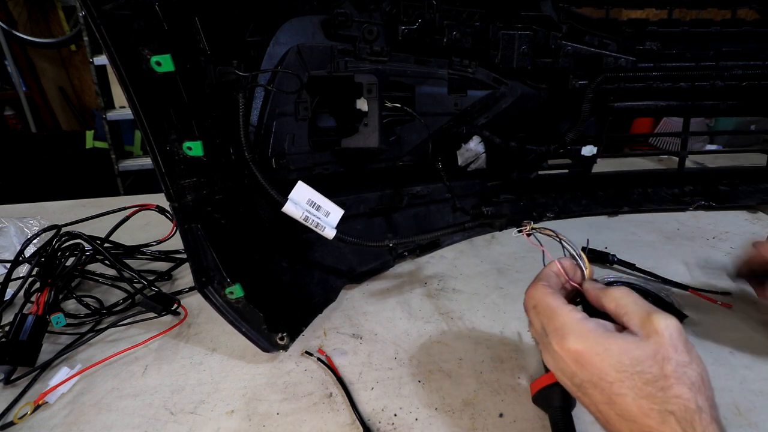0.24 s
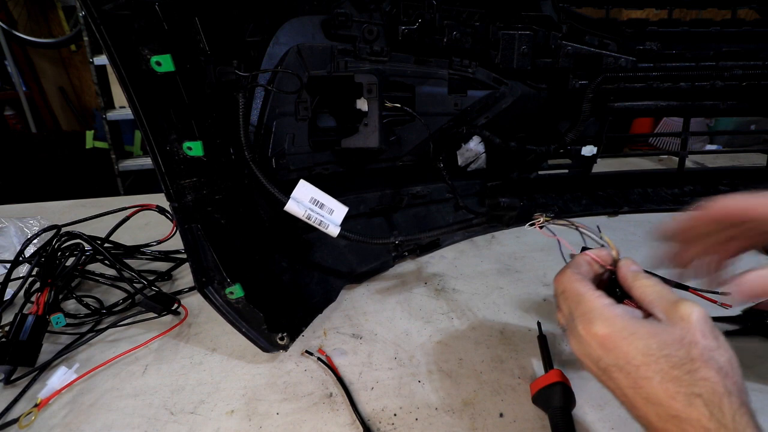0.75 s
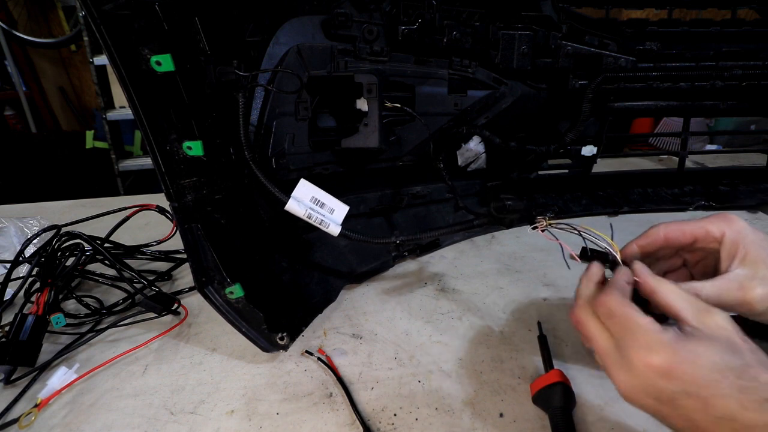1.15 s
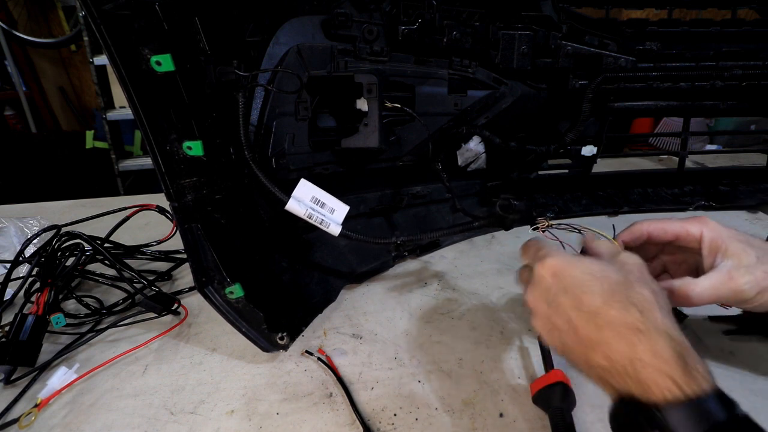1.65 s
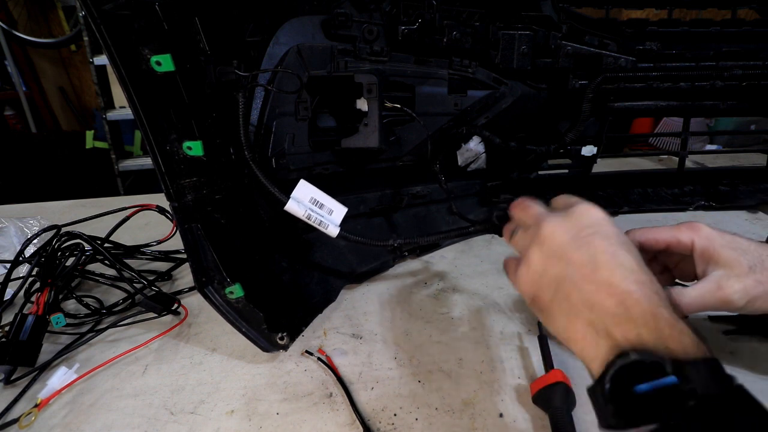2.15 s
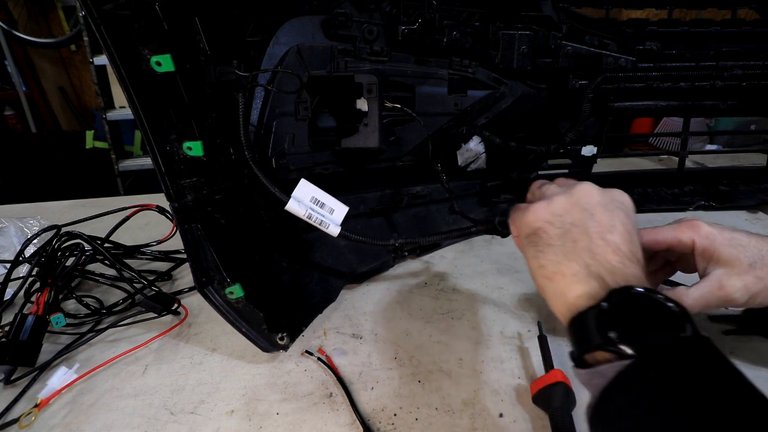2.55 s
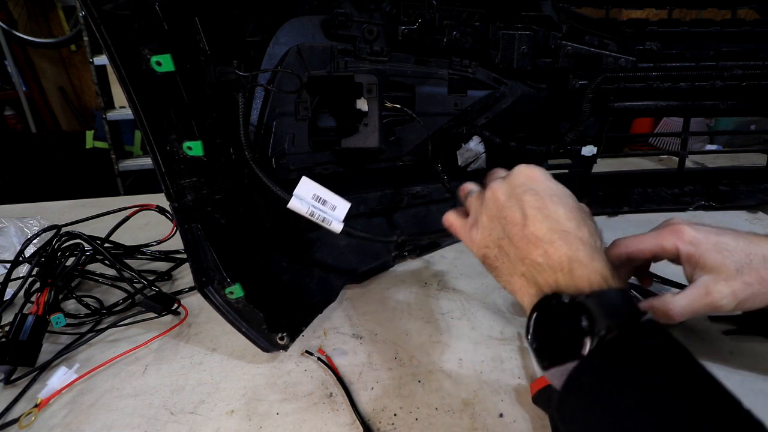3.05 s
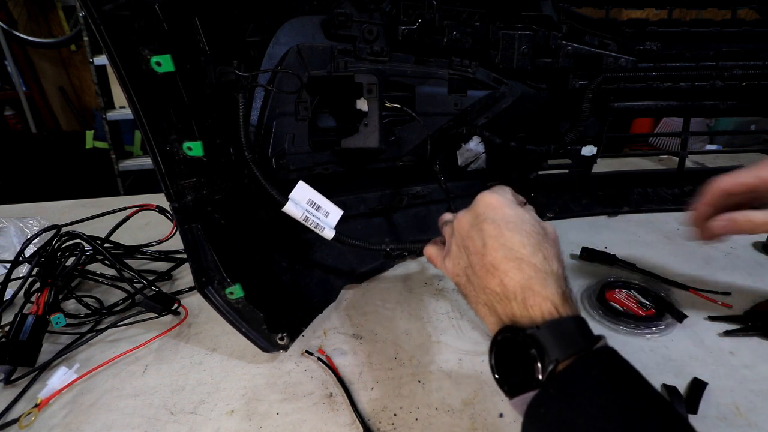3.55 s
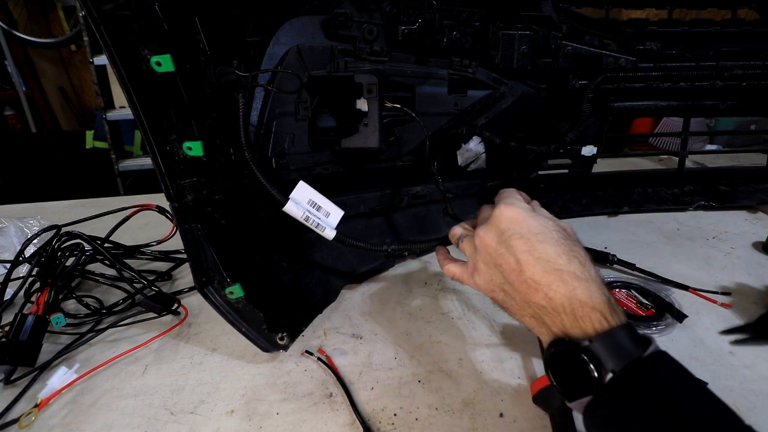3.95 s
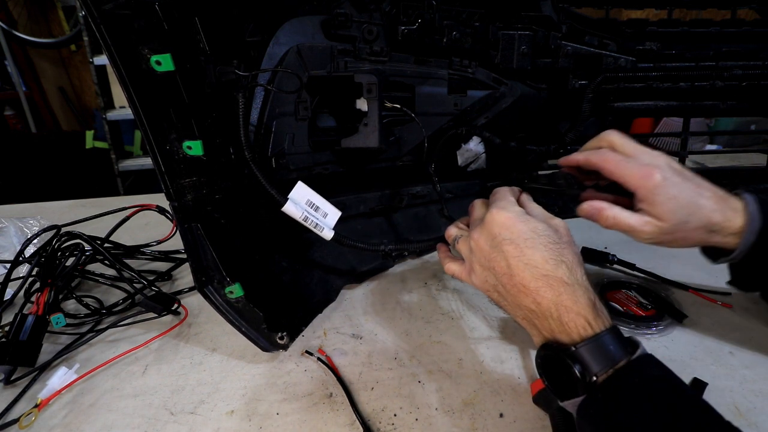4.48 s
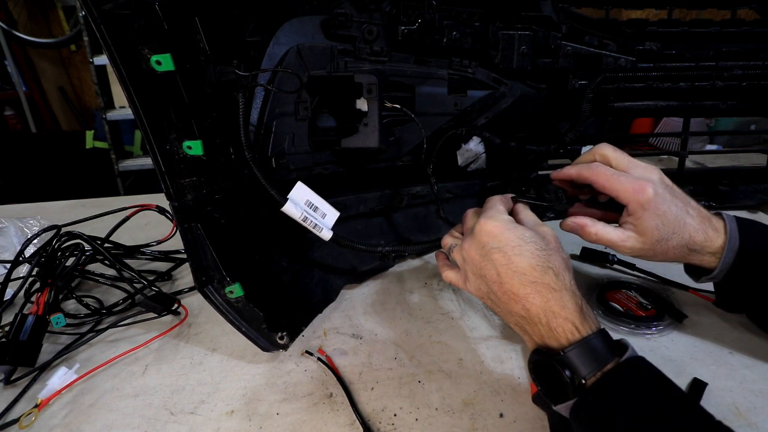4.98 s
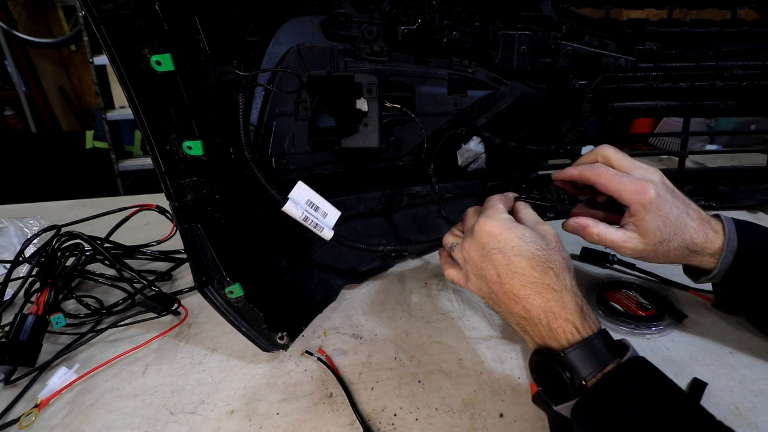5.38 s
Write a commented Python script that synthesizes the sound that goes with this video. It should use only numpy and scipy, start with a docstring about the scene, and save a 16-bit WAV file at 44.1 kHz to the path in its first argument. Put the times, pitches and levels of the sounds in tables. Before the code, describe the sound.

Hollow knocks and rattles of a tool set down on a bench, then faint wire rustling, small clicks, and more knocks in a garage.

```python
"""A sleeve brushes past and a part clicks, then hollow knocks set a bench top ringing: wiring work
on a cloth-covered bench in a garage, heard from close by, with soft reflections off the walls.
Knocks and rattles sum decaying modes and dense noise; clicks, ticks and rubs are slips driving
resonances; sleeve and drags are coloured grains of friction, and a squeak is a falling tone.
All of it sits in the middle over steady air; only the microphones' own hiss differs by side."""
import sys
import numpy as np
from scipy import signal
from scipy.fft import rfft, irfft
from scipy.io import wavfile
from scipy.ndimage import uniform_filter1d

SR = 44100
rng = np.random.default_rng(int(sys.argv[2]) if len(sys.argv) > 2 else 0)


def inscribe(sig):
    """Save sig as 16-bit PCM at rate SR to the path in sys.argv[1].

    A 1-D sig is mono; a 2-D sig holds one channel per row.
    Samples are clipped to [-1, 1] before scaling.
    """
    pcm = np.round(np.clip(np.atleast_2d(sig).T, -1, 1) * 32767)
    wavfile.write(sys.argv[1], SR, pcm.astype(np.int16))


N = 247842  # samples

# tools and hands knocking on the bench: [t/s, level/dB, contact cut-off f/Hz, thump f/Hz,
# thump level/dB, bench ringing level/dB]; the last two are relative within the blow
KNOCK_EVENTS = [(.415, -22, 2000, 102, -7, -3.5), (.546, -8.5, 1840, 214.5, -1.5, -6),
                (.583, -21.5, 1710, 178, -12, 23), (.6495, -7, 1700, 198, -1, -1),
                (.666, -13.5, 600, 188, 5, -8), (.717, -14, 1410, 235, 2, 1.5),
                (.733, -17, 1430, 462, 5.5, 2), (.764, -23, 1520, 192, 2, 2),
                (0.804, -19, 900, 186, 9.5, 0.5), (.878, -30, 900, 95, 20, 7.5),
                (1.538, -46.5, 1020, 644, -4, -13), (1.864, -31, 1930, 776, 6, 9),
                (1.981, -39.5, 1390, 600, -4, -6.5), (2.090, -35, 970, 561, -.5, -32),
                (2.858, -33, 2120, 167, -19, 1), (3.218, -30, 2600, 407, -7.5, -10.5),
                (3.238, -35.5, 500, 188, 11, -6), (3.553, -16.5, 1570, 105, 12.5, 11.5),
                (3.567, -26.5, 1470, 383, 15, -8), (3.625, -31, 500, 175, 0, -19),
                (3.852, -21.5, 1710, 95, -4.5, -7), (3.978, -14, 1700, 189, 2, 1.5),
                (3.999, -19, 1220, 190.6, 9, -4.5), (4.328, -36.5, 342, 115, 4.5, -1),
                (4.732, -50.5, 1680, 953, 1, 0)]
# bench top modes: [f/Hz, level/dB, t60/s]
BENCH_MODES = [(46.6, -5, 0.29), (91.8, -19, 0.52), (117.9, -8, 0.52), (180, 13, 0.06), (183.6, 4.5, 0.36),
               (202, -6, 0.56), (248, -4, 0.19), (362.2, 3.5, 0.17), (389, 1, 0.067), (509, 4.5, 0.12),
               (557.7, -1.5, 0.26), (884, 2.5, 0.21), (1150, 1, 0.11)]
# crowded higher modes of the bench and what lies on it: [f/Hz, density level/dB per Hz, t60/s]
PANEL_MODES = [(98, -6.5, 0.28), (276, 1, 0.44), (500, 4, 0.059), (666, -6.5, 0.18), (852, 1.5, 0.13),
               (1380, -4, 0.05), (3000, -9.5, 0.06), (15000, -0.5, 0.027)]
# a loose tool rattling after it lands: [t/s, level/dB]
RATTLE_EVENTS = [(.588, -26), (.659, -19), (.744, -22), (.764, -26), (.778, -25), (.785, -23), (.818, -30),
                 (.846, -36), (3.987, -19), (4.013, -27), (4.044, -32), (4.062, -34)]
# what that tool rings with: [f/Hz, level/dB, t60/s]
TOOL_MODES = [(867, 8, 0.05), (1018, -7.5, 0.047), (1265, -12, 0.021), (1840, -14, 0.022),
              (2330, -12, 0.016)]
# wires, jaws and plastic parts clicking: [t/s, level/dB, ring f/Hz, ring level/dB against the snap,
# swell of the slip t/s, brightness level/dB]
CLICK_EVENTS = [(0.031, -43, 2080, -4, 0.0011, 5), (0.729, -17.5, 2400, -16, 0.0013, 8),
                (0.934, -38, 3920, -7, 0.0015, 9), (1.041, -46, 5750, -2, 0.0043, -14),
                (1.429, -46.5, 2130, 3, 0.0041, 13), (2.076, -30.5, 2220, -12, 0.00063, 21),
                (2.085, -37.5, 3400, -17, 0.0041, 12), (2.159, -37.5, 1890, -14, 0.0026, 7),
                (2.325, -49.5, 2050, 20, .0008, -10), (2.54, -42, 2100, -1, 0.00035, -20),
                (2.701, -48.5, 3900, -6, 0.002, -6), (2.755, -45.5, 3420, -23, 0.0007, 19),
                (2.8929, -24.5, 1800, 10, 0.0012, -5), (2.904, -27, 1780, 16, 0.0042, 13),
                (2.913, -33.5, 1860, -14, 0.0045, 4), (2.942, -38.5, 5070, -12, 0.00098, 2),
                (2.971, -39, 1660, 3, .0015, -7), (3.026, -62, 1760, 2, 0.0013, -5),
                (3.202, -29, 1680, 1.5, 0.0035, 9), (3.2099, -31, 13200, -2, 0.00096, 10),
                (3.214, -29, 1830, 2.5, 0.0059, 3), (3.423, -37.5, 1620, 1, 0.004, 14),
                (3.5511, -35, 2300, -13, 0.0054, -10), (3.6116, -52, 2200, -2, .0015, -8),
                (3.6421, -63, 2400, -3, .001, -4), (3.9764, -19.5, 2140, 20, 0.0023, -25),
                (3.997, -27.5, 2160, 18, 0.0024, -16)]
# the sharp part of a click: [f/Hz, density level/dB per Hz, t60/s]
SNAP_MODES = [(300, 8.5, 0.042), (1210, -7, 0.091), (2030, 8.5, 0.021), (4300, -3, 0.028),
              (7300, 2.5, 0.0079), (10200, -2.5, 0.0019), (13800, -15, 0.017)]
# insulation squeaking between the fingers: [t/s, peak level/dB, start f/Hz, end f/Hz]
SQUEAK_EVENTS = [(1.797, -45.5, 3360, 1890)]
# sleeve and fingers brushing: [peak t/s, peak level/dB, rise t/s, fall t/s]
BRUSH_STROKES = [(.01, -43.5, .11, 0.048), (.43, -48.5, 0.3, 0.16), (.92, -50, 0.23, 0.22),
                 (1.07, -47.5, 0.096, 0.14), (2.05, -54, 0.66, 0.52), (2.49, -50, 0.36, 0.46),
                 (3.04, -46.5, 0.71, 0.3), (3.94, -37.5, 0.45, 0.34), (4.38, -52, 0.38, 0.54)]
# wires rustling in the fingers, fading as the hands come to rest: [t/s, level/dB]
RUSTLE_LEVEL = [(0, -51.5), (1.4, -56.5), (3.3, -58.5), (4.6, -60.5), (5.62, -61.5)]
# cloth hiss: [f/Hz, density level/dB per Hz]
CLOTH_SPECTRUM = [(300, 5), (2500, 0), (3100, -4), (5300, -4.5), (8400, -6), (9800, -12.5), (12700, -11.5),
                  (16000, -17)]
# a tool or a hand dragged over the bench: [peak t/s, peak level/dB, rise t/s, fall t/s]
DRAG_STROKES = [(.505, -33.5, 0.18, 0.032), (.73, -28.5, 0.06, 0.3), (1.93, -49.5, 0.2, 0.55),
                (3.957, -31, 0.072, 0.13), (4.85, -57, 1, 0.99)]
# scrape on the bench: [f/Hz, density level/dB per Hz]
SCRAPE_SPECTRUM = [(100, -8.5), (450, 0), (700, -2.5), (950, -1.5), (1400, -4), (1900, -12.5), (12000, -30)]
# plastic, wire and tools sliding, each singing in one resonance: [peak t/s, peak level/dB, rise t/s,
# fall t/s, pitch at the peak f/Hz, glide/octaves per s, resonance width f/Hz]
RUB_STROKES = [(.26, -54.5, 0.99, 0.4, 1640, 0.3, 130), (.3, -62.5, .8, 0.62, 5460, 3, 900),
               (1.895, -60.5, 0.055, .2, 7300, 6.5, 4000), (2.01, -48, 0.13, 0.089, 1120, 14, 600),
               (2.465, -57, 0.08, 0.2, 4740, -0.5, 1100), (2.975, -39, 0.081, 0.15, 1730, 0, 220),
               (3.092, -40.5, 0.057, 0.035, 3370, 1, 1600), (3.86, -50, 0.26, 1, 2390, 0, 1400),
               (3.942, -28, 0.046, 0.1, 1120, -4, 450)]
# garage reverberation: [f/Hz, density level/dB per Hz, t60/s]
GARAGE_DECAY = [(80, 1, 0.43), (200.5, -16, 0.92), (1014, -4.5, 0.35), (5000, 0, 0.58), (14000, -39, 0.176)]
# steady air: [f/Hz, density level/dB per Hz]
AIR_SPECTRUM = [(12, -46), (25, -11), (64, -2.5), (242, -2.5), (451, -11), (911, -15), (1160, -27),
                (4140, -32.5), (13600, -28), (16000, -30)]

HIT_SIZE, CLICK_SIZE = 600, 400  # samples: the loudest stretch that sets the level of a hit or click
SETTLE_S, SETTLE_DB, SETTLE_HZ = 0.01908, -9.5, 410  # delay, level against the blow, cut-off
STROKE_RANGE_DB = 20  # the drop that a stroke's rise and fall times refer to
RESTING_DB = -65.5  # the forearms scrape faintly all the while
FLUTTER_HZ, FLUTTER_DB = 54.3, 2.5  # a sliding contact grips and lets go unevenly
AIR_DB = -52.5
CUTOFF_HZ = 15900  # top of the recorded band


def knocks(scatter_db=4, body_db=-2, dense_db=5.5, push_db=-6.0, push_ratio=0.62,
           push_width_hz=450, thump_width_hz=27, crack_db=-34, lead_s=0.0056):
    """Each blow shoves the bench and sets it ringing; a soft contact is slower and lacks treble."""
    out, t = np.zeros(N), np.arange(SR) / SR
    mode_db, modes = ringing_modes(BENCH_MODES, t)
    signs = (-1) ** (np.arange(len(modes)) // 2)
    bump = settle()
    for s, db, contact_hz, thump_hz, thump_db, ring_db in KNOCK_EVENTS:
        push = pulse(push_ratio * contact_hz, push_width_hz)
        # every spot on the bench has its own thump and drives the modes a little differently
        thump = pulse(thump_hz, thump_width_hz)
        strengths = signs * from_db(mode_db + scatter_db * rng.standard_normal(len(modes)))
        body = attack_one(strengths @ modes, HIT_SIZE)
        dense = attack_one(dying_noise(PANEL_MODES, size=SR), HIT_SIZE)
        ring = from_db(body_db) * body + from_db(dense_db) * dense
        hit = from_db(push_db) * push + from_db(thump_db) * thump + from_db(ring_db) * ring
        hit = butter(hit, contact_hz, "low")
        add(out, s, from_db(db) * attack_one(hit, HIT_SIZE))
        add(out, s + SETTLE_S, from_db(db + SETTLE_DB) * bump)
        # grit crunches just before the tool seats
        grit = rng.standard_normal(SR) * np.exp(-t / 0.007)
        crack = butter(grit, [3500, 12000], "band", order=1)
        add(out, s - lead_s, from_db(db + crack_db) * attack_one(crack, HIT_SIZE))
    return out


def settle(thump_hz=183, width_hz=13, thump_db=10):
    """The dull bump of a weight coming to rest: mostly the bench's main mode."""
    thump = from_db(thump_db) * pulse(thump_hz, width_hz)
    dense = attack_one(dying_noise(PANEL_MODES, size=SR), HIT_SIZE)
    return attack_one(butter(thump + dense, SETTLE_HZ, "low"), HIT_SIZE)


def rattles(scatter_db=5.0):
    """Short hard contacts; each strikes the tool's modes with strengths of its own."""
    out, t = np.zeros(N), np.arange(SR // 2) / SR
    mode_db, modes = ringing_modes(TOOL_MODES, t)
    signs = (-1) ** np.arange(len(modes))
    for s, db in RATTLE_EVENTS:
        strengths = signs * from_db(mode_db + scatter_db * rng.standard_normal(len(modes)))
        add(out, s, from_db(db) * attack_one(strengths @ modes, HIT_SIZE))
    return out


def clicks(ring_width_hz=330, upper_ratio=1.38, upper_db=-7, bright_hz=8000):
    """A run of tiny slips swells and dies; each slip snaps and rings the part that is held."""
    out, size = np.zeros(N), 4096
    t = np.arange(size) / SR
    for s, db, hz, ring_db, swell_s, bright_db in CLICK_EVENTS:
        slips = rng.standard_normal(size) * (rng.random(size) < .25)
        slips = slips * t / swell_s * np.exp(-t / swell_s)
        snap = signal.fftconvolve(slips, dying_noise(SNAP_MODES, size=size))[:size]
        # treble shelf
        snap = snap + (from_db(bright_db) - 1) * butter(snap, bright_hz, "high", order=1)
        ring = resonate(slips, hz, ring_width_hz)
        ring = ring + from_db(upper_db) * resonate(slips, hz * upper_ratio, ring_width_hz)
        click = rms_one(snap) + from_db(ring_db) * rms_one(ring)
        add(out, s, from_db(db) * attack_one(click, CLICK_SIZE))
    return out


def ticks(tick_db=-4):
    """Wires flick against each other now and then, following the level of the rustle."""
    flicks = grains(per_s=13, spread_db=2.0)
    flicks = signal.fftconvolve(flicks, dying_noise(SNAP_MODES, size=4096))[:N]
    return from_db(tick_db) * gain_in_time(RUSTLE_LEVEL) * rms_one(flicks)


def squeaks(length_s=0.0163):
    """Stick and slip on insulation: a brief tone that falls as the finger slows."""
    out, size = np.zeros(N), round(length_s * SR)
    for s, db, start_hz, end_hz in SQUEAK_EVENTS:
        phase = 2 * np.pi * np.cumsum(np.geomspace(start_hz, end_hz, size)) / SR
        add(out, s, from_db(db) * np.hanning(size) * np.sin(phase))
    return out


def rubs():
    """Fluttering slips drive a resonance that glides as the contact moves along."""
    out, t = 0, np.arange(N) / SR
    slips = grains(per_s=930, spread_db=0.5)
    for s, db, rise, fall, hz, glide, width_hz in RUB_STROKES:
        centre_hz = hz * 2 ** (glide * np.clip(t - s, -rise, fall))
        song = rms_one(gliding(slips, centre_hz, width_hz))
        out = out + strokes([(s, db, rise, fall)]) * flutter(FLUTTER_HZ, FLUTTER_DB) * song
    return out


def friction():
    """Cloth hisses finely in uneven folds; a dragged tool scrapes more coarsely."""
    hiss = colour(grains(per_s=7000, spread_db=2.0), CLOTH_SPECTRUM)
    sleeve = np.hypot(strokes(BRUSH_STROKES), gain_in_time(RUSTLE_LEVEL)) * hiss
    scrape = colour(grains(per_s=2500, spread_db=1.5), SCRAPE_SPECTRUM)
    tool = np.hypot(strokes(DRAG_STROKES), from_db(RESTING_DB)) * scrape
    return sleeve * flutter(rate_hz=40, depth_db=2.8) + tool


def garage(x, build_s=0.0044):
    """Reflections build up and die away between the walls."""
    build = (1 - np.exp(-np.arange(SR) / SR / build_s)) ** 2
    tail = dying_noise(GARAGE_DECAY, size=SR) * build
    return signal.fftconvolve(x, tail / np.sqrt(np.sum(tail ** 2)))[:N]


def air():
    """The steady air behind the work: noise with a fixed spectrum."""
    return from_db(AIR_DB) * colour(rng.standard_normal(N), AIR_SPECTRUM)


def from_db(db):
    """Level in dB to amplitude."""
    return 10 ** (np.asarray(db) / 20)


def rms_one(x):
    """Scale to rms 1."""
    return x / np.sqrt(np.mean(x ** 2) + 1e-20)


def attack_one(x, size):
    """Scale a hit so that its loudest stretch of `size` samples has rms 1."""
    return x / np.sqrt(np.max(uniform_filter1d(x ** 2, size, mode="constant")) + 1e-20)


def gain_in_time(rows):
    """A [t/s, level/dB] curve as a gain for every sample."""
    return from_db(np.interp(np.arange(N) / SR, *np.transpose(rows)))


def at_hz(points, hz, axis=1):
    """One column of a table, read on a log-frequency axis."""
    table = np.array(points)
    return np.interp(np.log(hz + 1), np.log(table[:, 0]), table[:, axis])


def add(out, s, sound):
    """Mix a sound in from time s."""
    start = max(round(s * SR), 0)
    out[start:start + len(sound)] += sound[:N - start]


def butter(x, hz, kind, order=2):
    """Butterworth filter, its corners kept inside the usable band."""
    corners = np.clip(hz, 10, .45 * SR)
    return signal.sosfilt(signal.butter(order, corners, kind, fs=SR, output="sos"), x)


def resonate(x, hz, width_hz):
    """One resonance with gain 1 on top."""
    r = np.exp(-np.pi * width_hz / SR)
    zeros = np.array([1, 0, -1]) * (1 - r * r) / 2
    poles = [1, -2 * r * np.cos(2 * np.pi * hz / SR), r * r]
    return signal.lfilter(zeros, poles, x)


def gliding(x, hz, width_hz):
    """A steep-sided resonance whose centre follows hz: shift down, smooth, shift back."""
    turn = np.exp(2j * np.pi * np.cumsum(hz) / SR)
    r = np.exp(-np.pi * width_hz / SR)
    return np.real(turn * signal.lfilter([1], [1, -2 * r, r * r], x / turn))


def pulse(hz, width_hz):
    """A damped swing: an impulse through one resonance, shorter when the resonance is wider."""
    impulse = signal.unit_impulse(SR) + 1e-18
    return attack_one(resonate(impulse, hz, width_hz), HIT_SIZE)


def ringing_modes(table, t):
    """Mode levels in dB, and a decaying sine of unit strength for each mode."""
    hz, mode_db, t60 = np.transpose(table)
    fades = from_db(-60 * t / t60[:, None])
    return mode_db, np.sin(2 * np.pi * hz[:, None] * t) * fades


def dying_noise(table, size):
    """Countless close modes: half-octave bands of noise, each with its own level and decay."""
    t, out = np.arange(size) / SR, 0
    edges = 62.5 * 2 ** (np.arange(17) / 2)
    for low, high in zip(edges, edges[1:]):
        hz = np.sqrt(low * high)
        fade = from_db(-60 * t / at_hz(table, hz, axis=2))
        band = rms_one(butter(rng.standard_normal(size) * fade, [low, high], "band"))
        # level per Hz at the onset, so a quick decay carries less energy
        band = band * np.sqrt((high - low) * np.mean(fade ** 2))
        out = out + band * from_db(at_hz(table, hz))
    return out


def colour(x, spectrum):
    """Give a steady sound a spectrum; rms 1."""
    gain = from_db(at_hz(spectrum, np.fft.rfftfreq(N, 1 / SR)))
    return rms_one(irfft(rfft(x) * gain, N))


def grains(per_s, spread_db):
    """Friction: tiny slips of uneven size at random moments."""
    sizes = from_db(spread_db * np.minimum(rng.exponential(1, N), 4))
    sizes = sizes * rng.choice([-1, 1], N)
    return sizes * (rng.random(N) < per_s / SR)


def strokes(rows):
    """Gain of strokes that swell and fade evenly in dB; their powers add."""
    t, power = np.arange(N) / SR, 0
    for s, db, rise, fall in rows:
        away = np.maximum((s - t) / rise, (t - s) / fall)
        power = power + from_db(db - STROKE_RANGE_DB * np.minimum(away, 10)) ** 2
    return np.sqrt(power)


def flutter(rate_hz, depth_db):
    """A gain that wavers at random, with two knots per cycle of rate_hz; rms 1."""
    knots = np.clip(rng.standard_normal(4096), -2, 2)
    place = np.arange(N) / SR * 2 * rate_hz
    return rms_one(from_db(depth_db * np.interp(place, np.arange(len(knots)), knots)))


def scene(knock_room_db=-12.5, click_room_db=-22, side_hiss_db=-64.5):
    """All sounds sit in the middle; only the microphones' own hiss differs between the sides."""
    bench = knocks() + rattles()
    parts = clicks() + ticks() + squeaks()
    room = garage(from_db(knock_room_db) * bench + from_db(click_room_db) * parts)
    middle = bench + parts + friction() + rubs() + room + air()
    side = from_db(side_hiss_db) * rng.standard_normal(N)
    return middle + side * np.array([[1], [-1]])


def record(dry):
    """Peaks beyond full scale are clipped flat, then a steep low-pass cuts the top."""
    low_pass = signal.ellip(12, .1, 100, CUTOFF_HZ, fs=SR, output="sos")
    return signal.sosfilt(low_pass, np.clip(dry, -1, 1))


dry = scene()
out = record(dry)
inscribe(out)
```